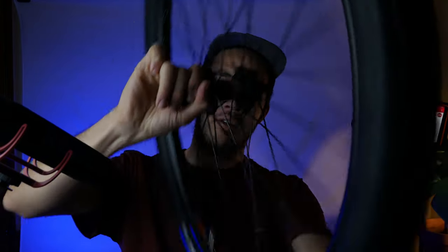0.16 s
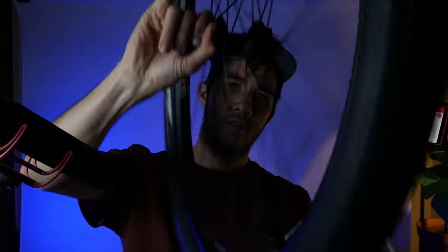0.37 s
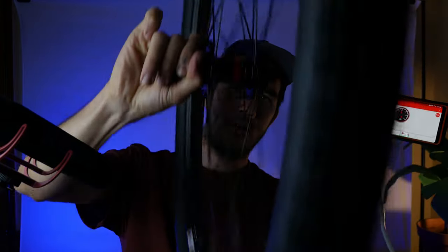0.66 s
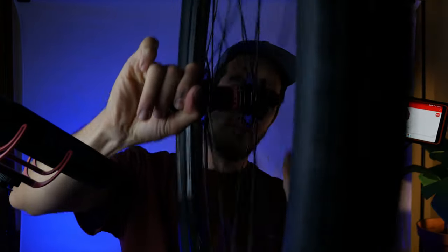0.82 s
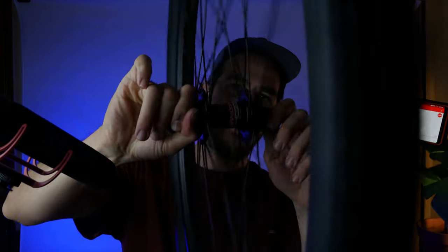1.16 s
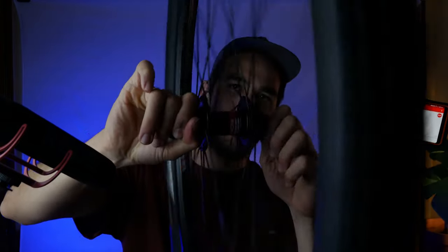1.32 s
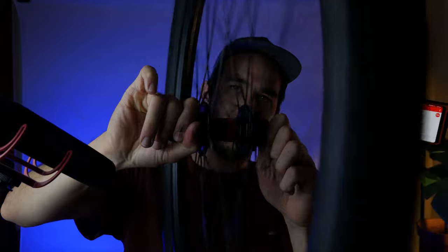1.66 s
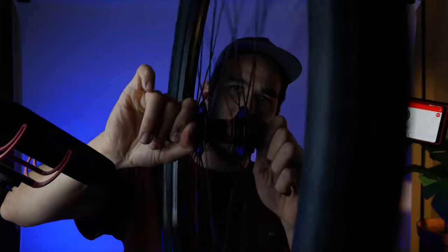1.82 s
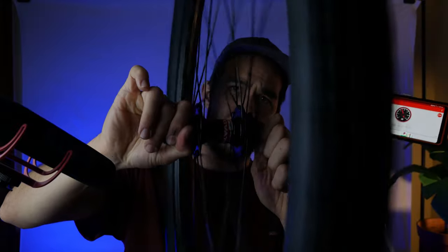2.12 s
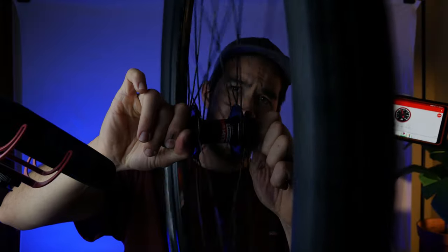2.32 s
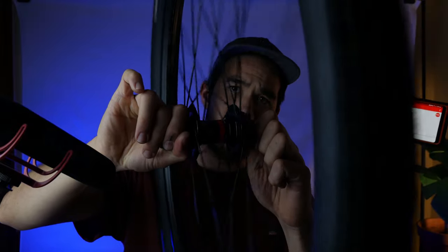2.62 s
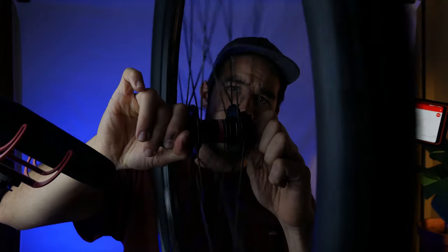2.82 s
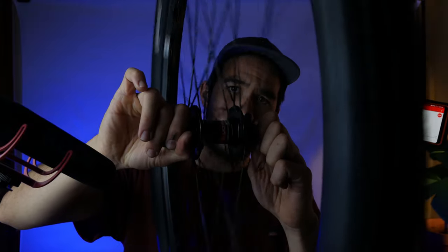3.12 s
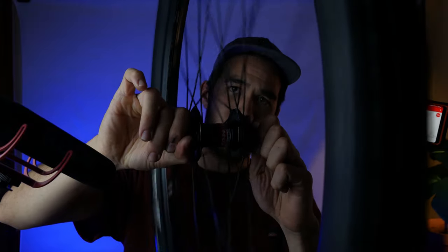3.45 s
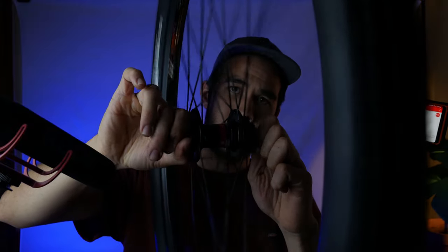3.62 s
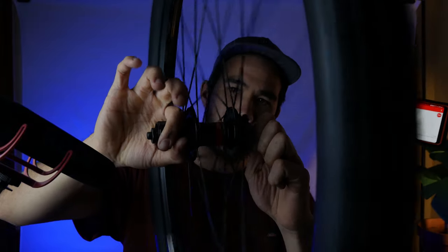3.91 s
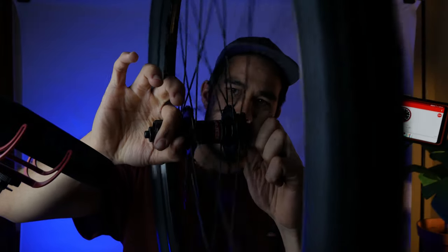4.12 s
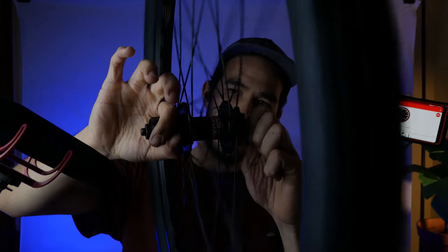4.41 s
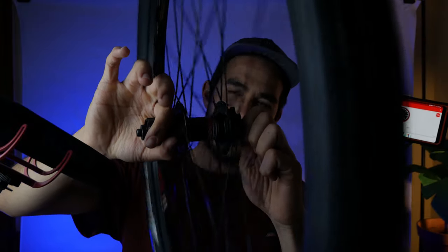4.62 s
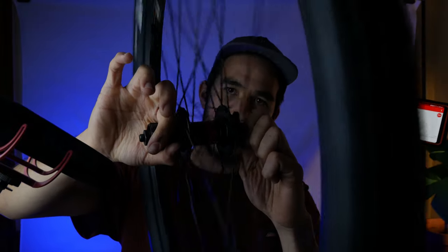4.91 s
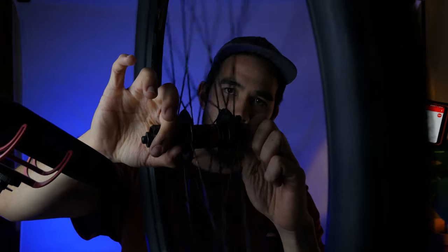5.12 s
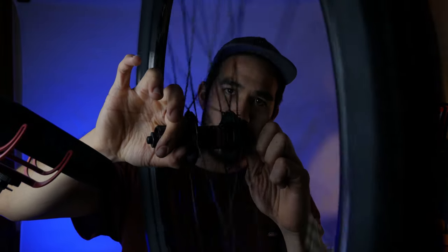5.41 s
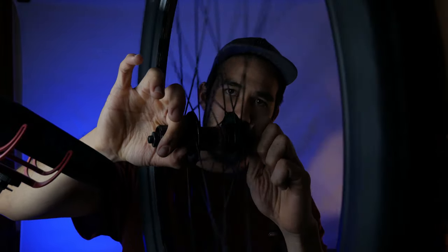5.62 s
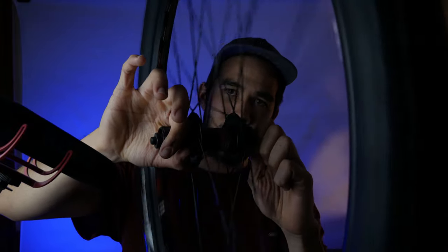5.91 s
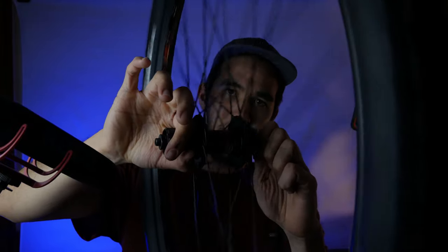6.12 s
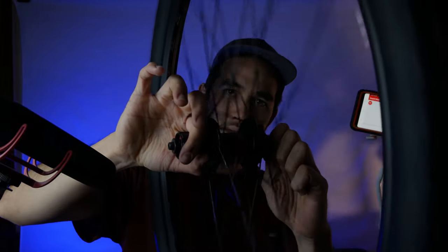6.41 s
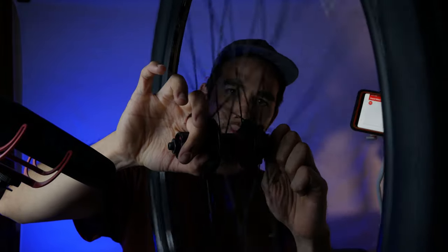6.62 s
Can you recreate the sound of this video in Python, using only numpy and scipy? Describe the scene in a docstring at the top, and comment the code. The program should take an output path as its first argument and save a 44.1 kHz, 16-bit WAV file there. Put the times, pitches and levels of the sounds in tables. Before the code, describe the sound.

A bicycle wheel is held by its axle close to the microphone in a small, damped room. From 0 s, sharp metallic freewheel clicks come about nine a second, tightening to fourteen by 0.5 s as the wheel is pushed. A soft tyre bump falls near 0.05 s; a gritty palm drag and hollow slap on the rubber come at 0.35-0.47 s. The ticking then runs evenly, fairly thin until about 2 s, when it becomes louder and closer, with fuller, brighter snaps from 2.5 s. It gradually slows to about eleven clicks a second by 6.7 s, without stopping. Each click is a few milliseconds of dry steel snap, sometimes audibly doubled once per turn, with faint ringing spokes and a short room tail. Very faint taps occur around 2.0, 3.6, 4.0 and 4.9 s. Soft bearing rumble, low mains hum and hiss remain underneath.

```python
"""First come the clicks of a bicycle wheel, held by its axle close to a microphone in a small damped room.
It is pushed and coasts down: the clicks quicken, then spread out. At each tooth two pawls land almost
together and ring the hub shell, spokes and rim as dying sines. A hand drags and slaps the tyre early on,
with a few taps later. Steady mains hum, noise shaped into bearing rumble, and hiss lie underneath."""
import sys
import numpy as np
from scipy import signal
from scipy.fft import rfft, irfft
from scipy.io import wavfile
from scipy.ndimage import uniform_filter1d

SR = 44100
rng = np.random.default_rng(int(sys.argv[2]) if len(sys.argv) > 2 else 0)


def put_to_file(sound):
    """Save the sound as 16-bit audio at rate SR, in the file named by the first command-line argument."""
    columns = np.atleast_2d(sound).T  # one column per channel
    safe = np.clip(columns, -1, 1)
    whole_steps = np.round(safe * 32767)
    wavfile.write(sys.argv[1], SR, whole_steps.astype(np.int16))


def level_to_linear(level):
    """Convert decibel levels to linear amplitude factors, elementwise."""
    exponent = np.asarray(level, float) / 20
    return 10 ** exponent


N = 298116  # length in samples


def read(points, hz):
    """Value of a spectrum table at hz, by straight lines on a log frequency axis."""
    f, value = np.transpose(points)
    return np.interp(np.log(hz + 1), np.log(f + 1), value)


def curve(rows):
    """A table over time, read at every sample."""
    s, value = np.transpose(rows)
    return np.interp(np.arange(N) / SR, s, value)


def evened(x):
    """The sound brought to unit rms."""
    return x / np.sqrt(np.mean(x ** 2) + 1e-20)


def packed(x, seconds):
    """The sound scaled to the energy that unit rms would have over the given seconds."""
    return x * np.sqrt(seconds * SR) / np.linalg.norm(x)


def add(mix, s, sound):
    """Mixes a sound in at s seconds."""
    part = mix[max(round(s * SR), 0):][:len(sound)]
    part += sound[:len(part)]


def coloured(points):
    """Steady noise with the given spectrum, unit rms."""
    hz = np.fft.rfftfreq(N, 1 / SR)
    spectrum = rfft(rng.standard_normal(N)) * level_to_linear(read(points, hz))
    return evened(irfft(spectrum, N))


def band_pass(x, low_hz, high_hz):
    """A part radiates little outside its own range."""
    sections = signal.butter(3, [low_hz, high_hz], "band", fs=SR, output="sos")
    return signal.sosfilt(sections, x)


def ring(modes, luck, size, scatter_db, detune):
    """Dying sines; each blow meets the modes at other strengths and slightly other pitch."""
    hz, db, t60 = np.transpose(modes)[:, :, None]
    t = np.arange(size) / SR
    strength, pitch = luck[:2 * len(modes)].reshape(2, -1, 1)
    level = level_to_linear(db + scatter_db * strength - 60 * t / t60)
    return (level * np.sin(2 * np.pi * hz * (1 + detune * pitch) * t)).sum(0)


# Mains hum at the microphone. Each row: frequency in Hz, level in dB rms.
HUM = [(60, -50.5), (120, -88.5)]


def hum():
    """Mains hum, steady sines."""
    t = np.arange(N) / SR
    return sum(level_to_linear(db) * np.sqrt(2) * np.sin(2 * np.pi * hz * t) for hz, db in HUM)


# Colour of the hiss. Each row: frequency in Hz, relative level in dB.
HISS_COLOUR = [(25, 11.5), (40, -32), (65, 7), (110, -5.5), (300, -7), (600, -22.5), (1200, -5),
               (2000, -33), (5000, -27), (9000, -19.5), (13000, -23), (16000, -33)]


def hiss():
    """Room hiss: steady coloured noise at -61 dB rms."""
    return level_to_linear(-61) * coloured(HISS_COLOUR)


# Rumble of the turning wheel in the hands. Each row: time in s, level in dB rms before a 1 dB cut.
RUMBLE = [(0.0, -75), (0.3, -63), (0.54, -53), (0.69, -56.5), (1.67, -59.5), (2.37, -59), (3.9, -61.5),
          (5.95, -60.5), (6.76, -64)]
# Broad resonances of the wheel. Each row: frequency in Hz, width in Hz, relative level in dB.
WHEEL_RESONANCES = [(238, 30, -14), (400, 36, -11.5), (860, 295, -3), (1767, 118, -1)]


def bearing():
    """Rolling noise coloured by the broad resonances of the wheel."""
    hz = np.fft.rfftfreq(N, 1 / SR)
    shape = level_to_linear(-1.0) / (1 + (hz / 300) ** 2)
    for centre_hz, width_hz, db in WHEEL_RESONANCES:
        shape = shape + level_to_linear(db) / (1 + (2 * (hz - centre_hz) / width_hz) ** 2)
    rolling = evened(irfft(rfft(rng.standard_normal(N)) * shape, N))
    return level_to_linear(curve(RUMBLE) - 1.0) * rolling


# The clicks, close by. Each row: start in seconds, level of the steel ring in dB, of the high shell in dB.
TEETH = [(0.001, -23, -29.5), (0.111, -23.5, -24.5), (0.206, -21.5, -27.5), (0.2863, -26, -32),
         (0.3633, -22.5, -28.5), (0.431, -24, -33), (0.5004, -27, -34.5), (0.5729, -26, -33.5),
         (0.639, -27, -31), (0.7087, -29.7, -27), (0.7818, -22, -25.5), (0.8503, -22, -32.3),
         (0.9199, -24, -25), (0.988, -24.5, -23.5), (1.0547, -26.5, -30.1), (1.1225, -25, -29.5),
         (1.1918, -26, -27), (1.2615, -25, -30), (1.3306, -28.4, -34), (1.4012, -23, -31),
         (1.4699, -19, -25.6), (1.536, -22.0, -22.5), (1.6042, -26.5, -23), (1.6722, -27, -30.5),
         (1.739, -28, -27), (1.8063, -26.5, -23), (1.877, -26, -28), (1.9475, -22.5, -27),
         (2.0186, -20.5, -26), (2.0909, -20.5, -27.1), (2.1631, -21, -26.8), (2.2368, -21.1, -27),
         (2.3111, -21.9, -30), (2.3839, -19.5, -31.2), (2.4568, -18, -26.5), (2.5317, -17.5, -23),
         (2.606, -22, -21.7), (2.679, -20, -22.5), (2.7523, -17.5, -24.5), (2.8249, -17.5, -22),
         (2.8975, -20, -19.5), (2.9705, -23, -24.0), (3.0451, -19.5, -19.5), (3.1186, -20.9, -18),
         (3.1946, -22, -20.5), (3.2703, -20, -28), (3.3471, -21.9, -22.5), (3.4254, -21, -21),
         (3.5039, -18.9, -22), (3.5847, -18, -16.5), (3.6645, -16.5, -15.5), (3.7414, -20, -15.4),
         (3.8187, -19.5, -20.5), (3.8951, -18, -20), (3.9699, -17.5, -16.5), (4.0491, -22, -15.5),
         (4.128, -22.5, -21), (4.2047, -16.5, -20), (4.285, -18.0, -17), (4.3662, -18, -17.5),
         (4.4488, -21.5, -21.5), (4.5326, -23, -21.2), (4.6163, -20.5, -23.5), (4.701, -21.9, -23),
         (4.7877, -17, -20), (4.8732, -16, -15), (4.9596, -17, -21.5), (5.0453, -18, -25.5),
         (5.1314, -17.4, -18.5), (5.2173, -19, -16.6), (5.3041, -20, -18.1), (5.3925, -21, -28.5),
         (5.479, -17.5, -20), (5.5679, -19, -15.5), (5.656, -18, -18.5), (5.7439, -20.8, -23.5),
         (5.8345, -21.5, -21), (5.9255, -19, -20), (6.0159, -18.5, -25), (6.1071, -17.5, -19.7),
         (6.199, -16.5, -17.5), (6.2923, -17, -19.8), (6.3855, -18, -24), (6.479, -19, -20.5),
         (6.572, -20, -20), (6.667, -19, -21.5)]


def lag_ms():
    """Delay of the second pawl at every click, repeating with each 15-tooth turn of the wheel."""
    turn_teeth, loose_tooth = 15, 1  # once a turn the pawls land apart, most at the loose tooth
    widest_ms, least_ms = 2.8, .35
    opens_ms, closes_ms = .9, .6  # change per tooth before and after the loose tooth
    away = (np.arange(len(TEETH)) - loose_tooth + 7) % turn_teeth - 7
    narrowing = abs(away) * np.where(away < 0, opens_ms, closes_ms)
    return np.maximum(widest_ms - narrowing, least_ms)


BOUNCE_MS = 1.0  # time in which the bounces at first lose nearly 14 dB


def bounces(when):
    """Sixteen scattered contacts over 3 bounce times, softening to a floor: samples late, and force."""
    place_ms = ((np.arange(16) + when) / 16) ** 1.2 * 3 * BOUNCE_MS
    late = np.clip(place_ms * SR / 1000, 0, 399).astype(int)
    return late, level_to_linear(-14.0 * place_ms / BOUNCE_MS) + level_to_linear(-15)


# Modes of the wheel, part by part. Each row: frequency in Hz, relative level in dB, 60 dB decay time in s.
STEEL_RING = [(7950, -10, .003), (8350, -4, .004), (8800, -2, .0045), (9350, 0, .005), (9850, -4, .004),
              (10500, -9, .0035), (11200, -10, .004), (12000, -10, .004), (12700, -11, .004),
              (13700, -17, .003), (14900, -22, .003)]
RIM = [(1860, 0.5, 0.0085), (2030, 1.7, 0.008), (2390, 2.4, 0.016), (2803, 16.7, 0.0041)]
SHELL_LOW = [(3570, 13, 0.013), (3976, 14, 0.013), (4490, 41.4, 0.002)]
SHELL_HIGH = [(4950, -11, .004), (5420, -2, .005), (5700, 0, .0055), (6300, -8, .004), (6750, -9, .004)]
SPOKES = [(757.8, -33, 0.23), (875, -25, 0.017), (1647, -29.5, 0.29), (1735, -31.5, 0.19), (2038, -29, 0.1),
          (2318, -25.5, 0.11), (2530, -26, 0.11), (2945, -36.5, 0.3), (3820, -28, 0.14), (5500, -19, 0.073),
          (9830, -15, 0.041)]
# Steel ring, rim, low shell, high shell. Each row: lowest Hz, highest Hz,
# offset in dB of what is sent all round the room, relative share of the snap that reaches the part.
PARTS = [(8350, 14540, 1, 0.58), (1376, 3770, -5, 0.12), (3460, 4550, -6.5, 0.9), (5024, 7840, -5.5, 1.5)]
# Brightness of the steel ring, upper modes against lower. Each row: time in s, tilt in dB per octave.
TILT = [(0, -21), (.5, -13), (1.6, 12), (2.2, -39), (4, -10), (5, -24), (6.76, -28)]
# Lower parts in each click, before scatter. Each row: time in s, rim level in dB, low shell level in dB.
LOWER = [(0.0, -31, -27), (0.35, -28, -36.5), (0.6, -34.5, -34), (0.9, -34.5, -29.5), (1.3, -26.5, -25.2),
         (1.7, -33, -25.5), (2.1, -30.5, -26), (2.4, -30, -28.5), (2.75, -31, -28), (3.0, -27.5, -27.5),
         (3.25, -29.5, -29), (3.5, -32.5, -16), (3.9, -34.5, -29.5), (4.4, -36.5, -34),
         (4.999, -32.0, -32.5), (5.5, -38.5, -31), (6.3, -30, -28.5), (6.7, -43, -27)]
# Long ring of the spokes. Each row: time in s, level offset in dB.
SPOKE_LEVEL = [(0, -2), (.7, -6), (3.5, -6), (4.3, -1), (5, -3), (6, -4), (6.76, -1.5)]
# Strength of the clicks sent all round the room. Each row: time in s, level offset in dB.
FAR = [(0, -17.5), (.3, -10.5), (1.3, -13), (3.5, -15), (6.76, -15.5)]


def freewheel():
    """Touch, snap and bounces of one pawl, then of the other, ring each part: to microphone, and all round."""
    like_spokes = 4  # spokes of nearly equal pitch that ring together
    lower_scatter_db, second_scatter_db, spoke_scatter_db = 3, 2.5, 2  # from click to click
    out = np.zeros((2, N))
    luck = rng.standard_normal((len(TEETH), 5 + like_spokes, 40))
    chance = rng.random((len(TEETH), 16))
    spoke_db, far_db, tilt_db = curve(SPOKE_LEVEL), curve(FAR), curve(TILT)
    octaves = np.log2(np.transpose(STEEL_RING)[0] / 9300)
    low_s, *low_db = np.transpose(LOWER)
    for (s, steel_db, high_db), lag, draw, when in zip(TEETH, lag_ms(), luck, chance):
        now = int(s * SR)
        lower = [np.interp(s, low_s, v) for v in low_db]
        rim_db, low_shell_db = lower + lower_scatter_db * draw[4, -2:]
        levels_db = steel_db, rim_db, low_shell_db, high_db
        steel = STEEL_RING + np.outer(tilt_db[now] * octaves, [0, 1, 0])
        tables = steel, RIM, SHELL_LOW, SHELL_HIGH
        late, force = bounces(when)
        second = level_to_linear(-4 + second_scatter_db * draw[4, -3])  # second pawl against the first
        for modes, part, part_db, own in zip(tables, PARTS, levels_db, draw):
            low_hz, high_hz, round_db, share = part
            pawls = np.zeros(400)
            np.add.at(pawls, late, force * own[-16:] * level_to_linear(-9.0))
            pawls[8 + int(8 * when[0])] += share * 0.71  # the snap home
            pawls += second * np.roll(pawls, int(lag * SR / 1000))
            modes_ring = ring(modes, own, size=800, scatter_db=2.5, detune=.015)
            close = band_pass(signal.fftconvolve(modes_ring, pawls), low_hz, high_hz)
            add(out[0], s, level_to_linear(part_db) * packed(close, 0.0028))
            # over all directions the peaks merge: the modes are damped sooner
            blurred = band_pass(modes_ring * level_to_linear(-30.0 * np.arange(800) / 100), low_hz, high_hz)
            # part of the change from tooth to tooth is only which side faces the microphone
            all_round_db = 0.42 * part_db + round_db + far_db[now]
            add(out[1], s, level_to_linear(all_round_db) * packed(blurred, 0.0029))
        spokes = sum(ring(SPOKES, own, size=6000, scatter_db=3, detune=.016) for own in draw[5:])
        spokes = band_pass(spokes, 625, 11700)
        ring_db = (steel_db + rim_db) / 2 + spoke_scatter_db * draw[4, -4] + spoke_db[now]
        for side in out:
            add(side, s, level_to_linear(ring_db) * spokes)
    return out


# Colour of the damped room. Each row: frequency in Hz, 60 dB decay time in s.
ROOM_DECAY = [(300, 0.25), (1500, 0.41), (4000, 0.26), (6000, 0.21), (9000, 0.23), (12000, 0.19),
              (15000, 0.19)]
# Each row: frequency in Hz, relative level of the tail in dB.
ROOM_COLOUR = [(300, -12), (1600, 3.5), (3200, -2), (3900, 4.5), (4700, 4.5), (5600, 2.5), (7300, -1),
               (8900, 0), (11000, -1), (14500, -3.5), (16000, -4.5)]
# Echoes from close by. Each row: delay in s, level in dB against the direct sound.
ECHOES = [(.0072, -34), (0.0114, -32), (0.014, -49), (.021, -45)]


def room(near, around):
    """A few near echoes, and three diffuse tails fed in rotation, each band dying at its own speed."""
    taps = np.zeros((3, SR // 2))
    slots = np.arange(130, SR // 2 - 12, 12)
    at = slots + rng.integers(0, 12, (3, len(slots)))
    np.put_along_axis(taps, at, rng.choice([-1., 1.], at.shape), 1)
    hz, t, z = signal.stft(taps, SR, nperseg=128)
    z *= level_to_linear(read(ROOM_COLOUR, hz)[:, None] - 60 * t / read(ROOM_DECAY, hz)[:, None])
    tails = signal.istft(z, SR, nperseg=128)[1]
    tails = tails / np.linalg.norm(tails[0])
    # the feeds swing at 2.15 Hz, a sixth of a cycle apart, with constant summed power
    swing = np.pi * 4.3 * np.arange(N) / SR + np.pi / 3 * np.arange(3)[:, None]
    fed = around * np.cos(swing) * np.sqrt(2 / 3)
    out = level_to_linear(-15) * signal.fftconvolve(fed, tails, axes=1)[:, :N].sum(0)
    for s, db in ECHOES:
        add(out, s, level_to_linear(db) * near)
    return out


# Hand on the tyre. Each row: start in seconds, puff scale in dB, puff time constant in ms,
# level offset of the ringing air in dB, of the ringing wall in dB.
SLAPS = [(0.0529, -30, 0.71, -72, -64), (0.384, -47, 0.29, -41, -49), (.394, -35, 0.17, -63, -56),
         (.433, -50, 0.21, -28, -31), (.446, -44, 0.11, -22.5, -37), (2.024, -44, 0.96, -61, -42),
         (3.564, -33, 0.23, -58, -54), (3.978, -43, 0.7, -59, -62), (4.937, -46, 0.16, -60, -55)]
# What a slap rings. Each row: frequency in Hz, relative level in dB, 60 dB decay time in s.
TYRE_AIR = [(81, -11.5, 0.041), (254, -11, 0.11), (392, -18, 0.15)]
TYRE_WALL = [(844, -5, 0.087), (928, -1, 0.038), (1334, -8, 0.025), (1920, -3, 0.014)]
# Palm dragging over the tread. Each row: time in s, level in dB rms.
DRAG = [(.33, -59), (.355, -49), (.37, -39), (.4, -40.5), (.42, -48.5), (.445, -35.5), (.47, -68),
        (.52, -73.5)]
# Colour of the drag. Each row: frequency in Hz, relative level in dB.
DRAG_COLOUR = [(100, -71), (200, 2.5), (600, 3.5), (1200, -1.5), (2500, 8.5), (5000, -3), (10000, -22),
               (16000, -24)]


def hand():
    """Slaps and taps ring the tyre's air and wall, each with a soft puff; a grainy drag over the tread."""
    out = np.zeros(N)
    luck = rng.standard_normal((len(SLAPS), 2, 8))
    for (s, puff_db, puff_ms, air_db, wall_db), (air_luck, wall_luck) in zip(SLAPS, luck):
        u = np.arange(400) / SR * 1000 / puff_ms
        puff = (1 - u / 2) * u * np.exp(1 - u)  # a push and its rebound
        air = ring(TYRE_AIR, air_luck, size=6000, scatter_db=1, detune=.01)
        wall = ring(TYRE_WALL, wall_luck, size=6000, scatter_db=1, detune=.01)
        add(out, s, level_to_linear(air_db) * air + level_to_linear(wall_db) * wall)
        add(out, s, level_to_linear(puff_db) * puff)
    roughness = evened(uniform_filter1d(rng.standard_normal(N), size=90))
    grain = level_to_linear(3 * roughness)  # 3 dB rms of roughness
    return out + level_to_linear(curve(DRAG)) * evened(grain * coloured(DRAG_COLOUR))


def scene():
    """One close microphone feeds both channels; wheel and hand also sound in the room."""
    near, around = freewheel() + hand()
    mono = near + room(near, around) + bearing() + hum() + hiss()
    return np.array([mono, mono])


def roll_off(x):
    """The treble ends steeply here."""
    return signal.sosfilt(signal.butter(12, 16840, fs=SR, output="sos"), x)


# Difference between the channels against their sum. Each row: frequency in Hz, level in dB before flicker.
APART = [(60, -27), (200, -28.5), (1000, -22), (4000, -31), (9000, -30), (14000, -25.5)]


def record(dry):
    """The band ends at 16 kHz; the two channels differ faintly, in flickering patches."""
    dry = signal.sosfilt(signal.butter(12, 16000, fs=SR, output="sos"), dry)
    hz, t, z = signal.stft(dry[0], SR, nperseg=256)
    # one random level for every 8 bins by 8 frames
    patches = rng.standard_normal((17, len(t) // 8 + 1))
    patches = np.repeat(np.repeat(patches, 8, axis=0), 8, axis=1)[:len(hz), :len(t)]
    random_phase = np.exp(2j * np.pi * rng.random(z.shape))
    apart_level = level_to_linear(read(APART, hz)[:, None] + 6 * patches)
    apart = signal.istft(z * random_phase * apart_level, SR, nperseg=256)[1][:N]
    return roll_off(dry + np.array([apart, -apart]))


dry = scene()
out = record(dry)
put_to_file(out)
```